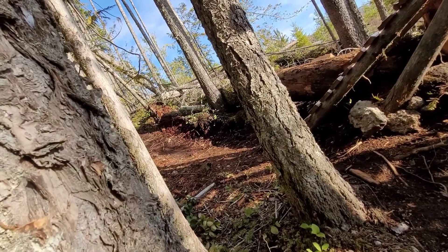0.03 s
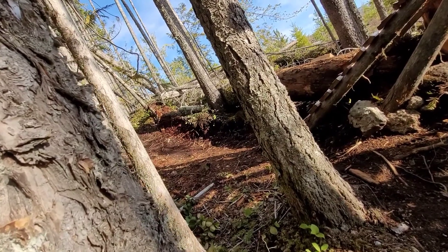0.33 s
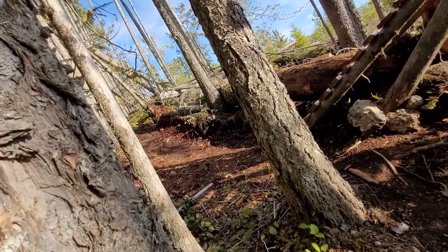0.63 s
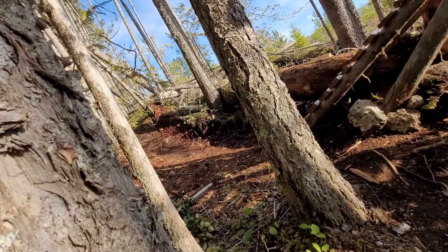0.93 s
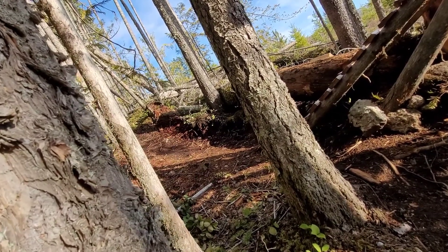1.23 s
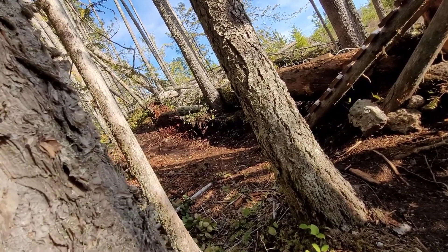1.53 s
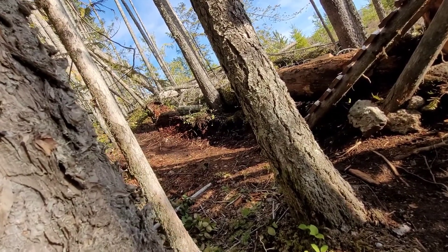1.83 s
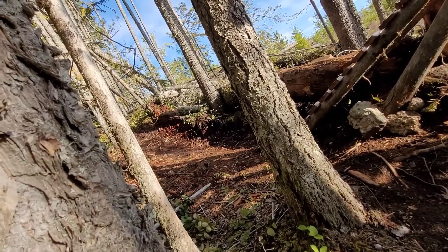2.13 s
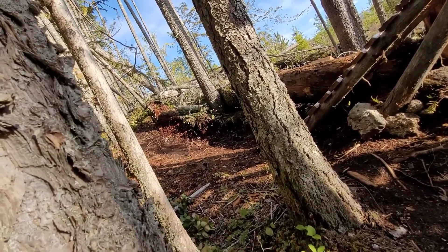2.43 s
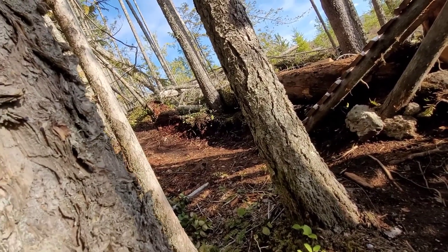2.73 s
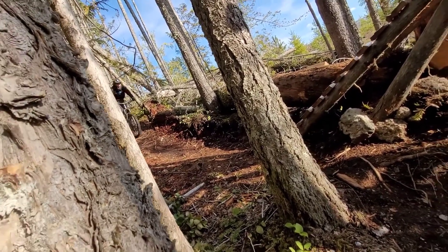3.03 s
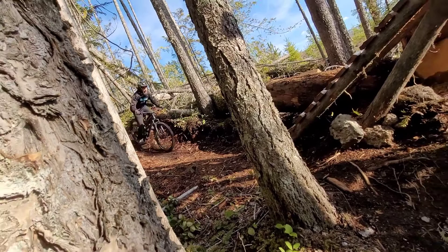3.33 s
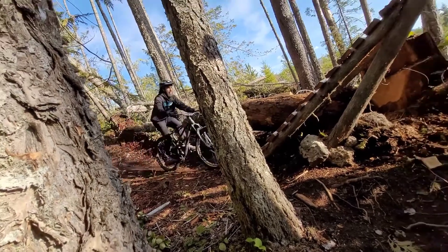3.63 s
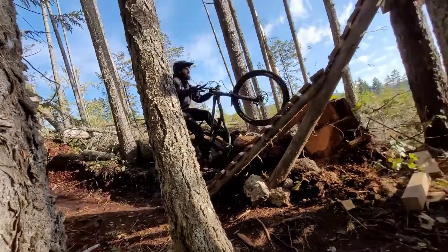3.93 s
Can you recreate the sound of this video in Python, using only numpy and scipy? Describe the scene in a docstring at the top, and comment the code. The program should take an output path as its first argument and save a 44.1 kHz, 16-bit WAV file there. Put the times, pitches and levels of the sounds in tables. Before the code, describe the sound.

A mountain bike approaches on a dirt trail, crunching and rattling over soft forest wind.

```python
"""Mountain bike on a forest trail

A bike comes down the dirt trail towards a stereo microphone, louder and brighter as it nears.
Its tyres hiss and crunch through needles and grit, knock over roots and buzz briefly under load
after the hardest blows; chain and frame tick and rattle, and the trunks return a dull echo.
Under it all are steady wind in the treetops, a low rumble and a faint, distant drone."""
import sys
import numpy as np
from scipy import signal
from scipy.io import wavfile
from scipy.ndimage import uniform_filter1d

SR = 44100
rng = np.random.default_rng(int(sys.argv[2]) if len(sys.argv) > 2 else 0)


def unload_wav(signal):
    """Save mono or channel-first audio to the path in sys.argv[1] as 16-bit WAV at rate SR, clipped to [-1, 1]."""
    wavfile.write(
        sys.argv[1],
        SR,
        np.round(np.clip(np.atleast_2d(signal).T, -1, 1) * 32767).astype(np.int16),
    )


N = 176400
T = np.arange(N) / SR

# How alike the air sounds in the two channels: (frequency [Hz], correlation [-1..1])
AIR_LIKENESS = [(60, 0.87), (130, 0.75), (290, 1), (640, 0.15), (1410, 0.23), (3100, 0.19), (15000, 0.0063)]
# The same for the bike: (frequency [Hz], correlation [-1..1])
BIKE_LIKENESS = [(60, 0.95), (240, 0.97), (480, 1), (950, 0.27), (1890, 0.01), (7500, 0.038), (15000, 0.19)]
# The bike's side of the microphone: (frequency [Hz], left minus right [dB])
BIKE_BALANCE = [(500, 0.5), (1000, 0.5), (1900, 2), (3800, 4), (7500, 3), (10000, 14), (12000, -6.5),
                (15000, -3)]


def tyres(far_s=2.65, near_s=3.5, dull_hz=4520, far_treble_db=-14):
    """Lumpy rolling below, a gritty crunch above that brightens as the bike nears the microphone."""
    # Rolling on packed dirt: (frequency [Hz], relative density [dB])
    roll_spectrum = [(50, -23), (85, -1), (130, 6), (175, -8.5), (260, 4), (400, -5), (650, -6),
                     (1300, -10), (2000, -20), (3500, -23), (6000, -37.5)]
    # Its rise on the approach: (time [s], level [dB])
    roll_level = [(2.5, -79), (2.62, -48), (2.74, -64), (2.9, -54.5), (3.04, -48), (3.1, -59),
                  (3.14, -46.5), (3.22, -47), (3.3, -58.5), (3.38, -46), (3.63, -45), (3.7, -35),
                  (3.765, -40.5), (3.79, -32.5), (3.86, -32), (3.91, -32), (3.96, -30.5), (4, -27)]
    # Needles and grit crushed by the tread: (frequency [Hz], relative density [dB])
    crunch_spectrum = [(1200, -15), (2200, 3.5), (3300, -1.5), (4600, -1.5), (6600, -2), (7900, 1),
                       (9000, -10), (11500, -1), (13500, -3.5), (15400, 2)]
    # The crunch before distance dulls it: (time [s], level [dB])
    crunch_level = [(2.5, -105), (2.58, -81), (2.63, -58.5), (2.75, -73), (2.855, -60), (2.875, -54),
                    (3.02, -59), (3.2, -51.5), (3.33, -60), (3.44, -48.5), (3.66, -46.5), (3.78, -39.5),
                    (3.92, -44), (3.95, -34.5), (4, -38.5)]
    lumps = grains(per_s=300, spread_db=2.5, share=.3)
    roll = coloured(lumps, roll_spectrum, BIKE_LIKENESS, flicker_db=2.2, balance=BIKE_BALANCE)
    grit = grains(per_s=650, spread_db=2, share=.55)
    crunch = coloured(grit, crunch_spectrum, BIKE_LIKENESS, flicker_db=1.5, balance=BIKE_BALANCE)
    dull = signal.lfilter(*signal.butter(1, dull_hz, fs=SR), crunch)
    treble_gain = from_db(np.interp(T, [far_s, near_s], [far_treble_db, 0]))
    crunch = dull + (crunch - dull) * treble_gain
    return roll * fader(roll_level) + crunch * fader(crunch_level)


def knocks(clatter_db=-5, clatter_decay_s=.012, right_lag_s=.00012):
    """Each root gives a thud of the tyre, a clack of the frame and a short clatter of loose parts."""
    # Blows from roots: (time [s], thud pitch [Hz], thud strength [dB], clack strength [dB])
    roots = [(2.603, 256, -39.5, -49.5), (2.858, 257, -41.5, -62), (2.975, 600, -39.5, -42.5),
             (3.132, 138, -36.5, -42), (3.164, 270, -37, -40), (3.344, 170, -40.5, -64),
             (3.366, 136, -29.5, -39.5), (3.415, 300, -39, -43), (3.446, 233, -28.5, -49),
             (3.523, 396, -28, -35), (3.547, 276, -38, -52), (3.674, 358, -32, -35.5),
             (3.714, 340, -20, -32), (3.778, 308, -13, -22), (3.792, 455, -27, -31), (3.832, 554, -47, -30),
             (3.868, 400, -25, -32), (3.882, 116, -21.5, -35), (3.9, 306, -22, -25), (3.932, 112, -20, -22),
             (3.935, 328, -21, -18.5), (3.966, 407, -17.5, -27)]
    # Loose parts shaking: (frequency [Hz], relative density [dB])
    clatter_spectrum = [(300, -12), (600, 2), (1300, 6), (2000, -5), (3500, -7), (6000, -19), (12000, -22)]
    times, _, _, clack_db = np.transpose(roots)
    body = sum(thud(start, hz, db) for start, hz, db, _ in roots) + frame_clacks(times, clack_db)
    shake = sum(from_db(db + clatter_db) * dying(start, clatter_decay_s) for start, _, _, db in roots)
    rattle = grains(per_s=1300, spread_db=1, share=.43)
    clatter = coloured(rattle, clatter_spectrum, BIKE_LIKENESS, flicker_db=4.5, balance=BIKE_BALANCE)
    return np.array([body, later(body, right_lag_s)]) + shake * clatter


def thud(start, hz, db, cycles=6.5):
    """A tyre hits a root and rings for a few cycles: the higher the thud, the shorter."""
    # Resonances of the thud: (multiple of its pitch, relative level [dB])
    modes = [(.4, -10.5), (1, 2), (1.9, -13)]
    click = np.zeros(N)
    click[int(start * SR)] = from_db(db)
    return sum(from_db(mode_db) * ring(click, hz * k, cycles / (hz * k)) for k, mode_db in modes)


def frame_clacks(times, levels_db, vary_db=3.5):
    """Each blow rings every mode of the frame with a strength of its own."""
    # Frame resonances: (frequency [Hz], relative level [dB], time to fall 60 dB [s])
    modes = [(747, -8, 0.04), (1140, -12, 0.036), (1340, -3, 0.014), (1956, -7.5, 0.023),
             (3060, -23, 0.024), (3530, -21, 0.019)]
    out = 0
    for k, (hz, db, t60) in enumerate(modes):
        blows_db = levels_db + db + vary_db * rng.standard_normal(len(times))
        clicks = np.zeros(N)
        clicks[(times * SR).astype(int)] = from_db(blows_db)
        out = out + (-1) ** k * ring(clicks, hz, t60)
    return out


def tread_buzz(sag_hz_per_s=420, db_per_octave=-22):
    """The knobs of a loaded tyre drum on the ground, sagging in pitch."""
    # Moments under load: (time [s], length [s], starting pitch [Hz], level [dB])
    buzzes = [(3.787, .066, 257.8, -25), (3.903, 0.026, 251.4, -30), (3.952, 0.038, 255.3, -22)]
    out = np.zeros(N)
    wobble = 1 + .05 * drift(41)
    for start, length, hz, db in buzzes:
        age = np.clip(T - start, 0, length)
        phase = 2 * np.pi * np.cumsum((hz - sag_hz_per_s * age) * wobble * (T > start)) / SR
        swell = np.sqrt(np.abs(np.sin(np.pi * age / length)))
        tone = sum(from_db(db_per_octave * np.log2(k)) * np.cos(k * phase) for k in range(1, 5))
        out += np.sqrt(2) * from_db(db) * swell * tone
    return out


def gravel(pings_per_s=700, spread_db=1.5, low_hz=2420, high_hz=4130, sizes=20, cycles=45):
    """Stones of many sizes ping under the tyres, each ringing briefly at its own pitch."""
    # Loose gravel on the trail: (time [s], level [dB])
    level = [(2.4, -100), (2.56, -72), (2.83, -100), (2.88, -58.5), (2.96, -62), (3.2, -54.5),
             (3.32, -70.5), (3.42, -57.5), (3.66, -55), (3.8, -42), (4, -48.5)]
    hits = rng.random(N) < pings_per_s / SR
    strength = from_db(spread_db * np.minimum(rng.exponential(1, N), 3))
    clicks = hits * strength * rng.standard_normal((2, N))
    size = rng.integers(0, sizes, N)
    stones = sum(ring(clicks * (size == k), hz, cycles / hz) * panned(at_hz(BIKE_BALANCE, hz))
                 for k, hz in enumerate(np.geomspace(low_hz, high_hz, sizes)))
    return fader(level) * rms_one(stones)


def chain(clicks_per_s=160, t60=.005):
    """Links click at random over the cogs, each click ringing the steel with a mix of its own."""
    # The jingle drawing closer: (time [s], level [dB])
    level = [(2.5, -110), (2.9, -76), (3.2, -66), (3.35, -82), (3.43, -61), (3.6, -53.5), (4, -45)]
    # Link resonances: (frequency [Hz], relative level [dB], left minus right [dB])
    modes = [(7830, -7, -3), (10800, -6, 11), (11700, -5, -1), (14100, 9, -2), (15800, 4, -17)]
    clicks = rng.random(N) < clicks_per_s / SR
    links = sum(from_db(db) * panned(pan_db) * ring(clicks * rng.standard_normal((2, N)), hz, t60)
                for hz, db, pan_db in modes)
    return fader(level) * rms_one(links)


def ticks(relative_width=.087, gain_db=-6.5):
    """Chain ticks, flung grit and snapping twigs: milliseconds of noise in one resonance each."""
    # Snaps: (time [s], pitch [Hz], relative level [dB], left minus right [dB], decay [s])
    snaps = [(.272, 14100, -63, 3, .008), (.667, 14600, -63.5, 0, .012), (.953, 10900, -64.5, -5, .007),
             (1.534, 4200, -58.5, 4, .018), (1.536, 5140, -65.5, 8, .018), (2.872, 14100, -55, -5, .015),
             (2.989, 5800, -49, 1, 0.0066), (3.072, 7100, -41.5, -2, 0.0026), (3.12, 14100, -46, -9, .004),
             (3.162, 4460, -39.5, 6, 0.0045), (3.288, 10500, -51, -2, 0.0065),
             (3.546, 10900, -38.5, 2, .007), (3.603, 14700, -30, -4, 0.005), (3.607, 10800, -37, 0, 0.0056),
             (3.71, 2920, -28, 5, 0.0046), (3.743, 7900, -25.5, 20, 0.0018), (3.745, 15400, -21, 4, .002),
             (3.935, 2950, -23, 5.5, 0.0069), (3.947, 15700, -17, -2, 0.0054)]
    out = np.zeros((2, N))
    for start, hz, db, pan_db, decay_s in snaps:
        b, a = signal.iirpeak(hz, 1 / relative_width, fs=SR)
        burst = rng.standard_normal((2, N)) * dying(start, decay_s)
        snap = signal.lfilter(b, a, burst + 1e-18) / np.sqrt(np.pi * hz * relative_width / SR)
        out += from_db(db + gain_db) * panned(pan_db) * snap
    return out


def ground():
    """The soft forest floor booms as the wheels press into it."""
    # The boom: (frequency [Hz], relative density [dB])
    spectrum = [(35, -2), (55, 7), (80, -12), (150, -15.5)]
    # Its swells close to the microphone: (time [s], level [dB])
    level = [(3, -86), (3.45, -49), (3.56, -49), (3.69, -37.5), (3.81, -27.5), (3.845, -38), (3.885, -27),
             (3.94, -25), (4, -50)]
    return fader(level) * evened(coloured(white(), spectrum, BIKE_LIKENESS, flicker_db=1))


def trunk_echoes(x, t60=.28, first_echo_s=.012, gain_db=-14, dull_hz=4200):
    """The trunks around the microphone scatter back a short, dull tail."""
    age = T[:SR // 2]
    tail = rng.standard_normal((2, len(age))) * from_db(-60 * age / t60) * (age > first_echo_s)
    tail /= np.sqrt(np.sum(tail ** 2) / 2)
    echoes = signal.fftconvolve(x, tail, axes=1)[:, :N]
    return from_db(gain_db) * butter(echoes, dull_hz, "low")


def wind(right_lag_s=.00039):
    """A smooth rush overhead, a fading rustle and a low rumble, reaching the left channel first."""
    # Wind in the treetops: (frequency [Hz], relative density [dB])
    rush_spectrum = [(150, -9.5), (190, -11.5), (250, -5.5), (370, -7.5), (520, -7.5), (750, -3),
                     (1150, -5), (1850, -9), (2400, -29.5), (3500, -53), (4500, -44)]
    # The rush before its treble is cut: (time [s], level [dB])
    rush_level = [(0, -49), (1.1, -49.5), (1.75, -50), (2.1, -49.5), (2.7, -51.5), (4, -48)]
    # Needles rustling in the wind: (frequency [Hz], relative density [dB])
    rustle_spectrum = [(1500, -2.5), (2600, -0.5), (4000, -11.5), (6000, -23.5), (9000, -40), (15000, -29)]
    # The rustle dying down: (time [s], level [dB])
    rustle_level = [(0, -68), (1.1, -67), (1.6, -68), (2, -73), (2.16, -70), (2.3, -80), (4, -79)]
    # Low rumble, the microphone body resonating near 50 Hz: (frequency [Hz], relative density [dB])
    rumble_spectrum = [(24, -24), (36, -13.5), (49, 6), (65, 1), (85, -6.5), (125, -14.5), (180, -37),
                       (300, -60)]
    # Its rise and fall: (time [s], level [dB])
    rumble_level = [(0, -47.5), (.14, -52.5), (.35, -45), (.48, -49.5), (1.05, -45.5), (1.27, -50.5),
                    (1.42, -45.5), (1.8, -53.5), (1.92, -46.5), (2.12, -43), (2.3, -56), (2.55, -47),
                    (2.8, -51.5), (3.05, -45.5)]
    rush = fader(rush_level) * coloured(white(), rush_spectrum, AIR_LIKENESS, flicker_db=.78)
    rush = butter(rush, 3000, "low")
    rustle = fader(rustle_level) * coloured(white(), rustle_spectrum, AIR_LIKENESS, flicker_db=.8)
    rumble = evened(coloured(white(), rumble_spectrum, AIR_LIKENESS, flicker_db=2.5))
    left, right = rush + rustle + rumble * fader(rumble_level) * panned(-1.4)
    return np.array([left, later(right, right_lag_s)])


def drone():
    """Two low, rough, wavering tones from far away."""
    # The drone's course: (time [s], fundamental [Hz], relative level [dB])
    course = [(0, 45, -61), (.22, 44, -57), (.34, 43.5, -46), (.5, 45, -56), (1.1, 45, -56), (1.5, 43, -53),
              (1.75, 42, -65), (3, 42, -66)]
    # Its two tones: (multiple of the fundamental, relative level [dB])
    harmonics = [(2, 0), (3, -6)]
    hz, db = in_time(course)
    phase = 2 * np.pi * np.cumsum(hz * (1 + .015 * drift(10))) / SR
    return sum(from_db(db + tone_db) * (1.2 + .6 * drift(9)) * np.sin(k * phase)
               for k, tone_db in harmonics)


def hiss(level_db=-83.5):
    """A faint steady hiss under everything."""
    # Its colour: (frequency [Hz], relative density [dB])
    spectrum = [(3000, -11), (6000, -2), (7700, 1), (9000, -6.5), (12000, -5.5), (15500, -2)]
    return from_db(level_db) * coloured(white(), spectrum, AIR_LIKENESS, flicker_db=.5)


def coloured(source, spectrum, likeness, flicker_db, balance=None):
    """Stereo bands of a noise, each with its own level, flicker, likeness and side; rms 1."""
    edges = np.r_[np.geomspace(26, 5600, 21), np.geomspace(5600, 16500, 9)[1:]]
    out = 0
    for k, (low, high) in enumerate(zip(edges, edges[1:])):
        if high < spectrum[0][0] or low > spectrum[-1][0]:
            continue
        hz = np.sqrt(low * high)
        mid, side = butter(source[k % 2], [low, high], "band")   # adjacent bands use unrelated noise
        alike = np.clip(at_hz(likeness, hz), -1, 1)
        band = np.sqrt(1 + alike) * mid + np.sqrt(1 - alike) * side * [[1], [-1]]
        gain = from_db(at_hz(spectrum, hz) + flicker_db * drift(7.2))
        out = out + gain * panned(at_hz(balance, hz) if balance else 0) * band
    return rms_one(out)


def grains(per_s, spread_db, share):
    """Random clicks of uneven size, mixed into white noise as a share of the power."""
    sizes = from_db(spread_db * np.minimum(rng.exponential(1, (2, 1, N)), 5))
    clicks = (rng.random((2, 1, N)) < per_s / SR) * sizes * white()
    return np.sqrt(share) * rms_one(clicks) + np.sqrt(1 - share) * white()


def white():
    """Two pairs of unrelated white noises."""
    return rng.standard_normal((2, 2, N))


def drift(hz):
    """A slow random wander of rms 1."""
    r = np.exp(-80 * np.pi * hz / SR)   # one step every 40 samples
    slow = signal.lfilter([1], [1, -2 * r, r * r], rng.standard_normal(N // 40 + 2002))[2000:]
    return np.interp(np.arange(N) / 40, np.arange(len(slow)), rms_one(slow))


def ring(clicks, hz, t60):
    """A unit click rings a sine of height 1 that falls 60 dB in t60 seconds."""
    r, w = from_db(-60 / (t60 * SR)), 2 * np.pi * hz / SR
    return signal.lfilter([0, np.sin(w)], [1, -2 * r * np.cos(w), r * r], clicks + 1e-18)


def dying(start, decay_s):
    """A sudden rise and an exponential fall."""
    return (T >= start) * np.exp(-np.clip((T - start) / decay_s, 0, 40))


def butter(x, hz, kind):
    """Second-order Butterworth filter."""
    return signal.sosfilt(signal.butter(2, hz, kind, fs=SR, output="sos"), x + 1e-18)


def later(x, lag_s):
    """Delay a signal."""
    return np.interp(T - lag_s, T, x)


def evened(x):
    """Hold stereo noise at a steady level."""
    return x / np.sqrt(uniform_filter1d(np.mean(x ** 2, axis=0), size=3000))


def rms_one(x):
    """Scale to rms 1."""
    return x / np.sqrt(np.mean(x ** 2) + 1e-20)


def in_time(rows):
    """Each column of a curve at every sample."""
    times, *columns = np.transpose(rows)
    return [np.interp(T, times, column) for column in columns]


def fader(level):
    """A level curve as a gain at every sample."""
    return from_db(in_time(level)[0])


def at_hz(points, hz):
    """Read a spectrum on a log-frequency axis."""
    frequencies, values = np.transpose(points)
    return np.interp(np.log(hz), np.log(frequencies), values)


def panned(db):
    """Left and right gains for a level difference."""
    return from_db(np.array([[db], [-db]]) / 2)


def from_db(db):
    """Decibels to gain."""
    return 10 ** (np.asarray(db) / 20)


def scene():
    """The bike among the trees, heard from the trail over wind, drone and hiss."""
    bike = tyres() + gravel() + knocks() + tread_buzz() + chain() + ticks()
    return bike + trunk_echoes(bike) + ground() + wind() + drone() + hiss()


def record(dry, low_cut_hz=28, top_hz=15850):
    """The recorder rolls off the deepest bass and cuts the top steeply."""
    top_cut = signal.ellip(12, .2, 80, top_hz, fs=SR, output="sos")
    return signal.sosfilt(top_cut, butter(dry, low_cut_hz, "high"))


dry = scene()
out = record(dry)
unload_wav(out)
```